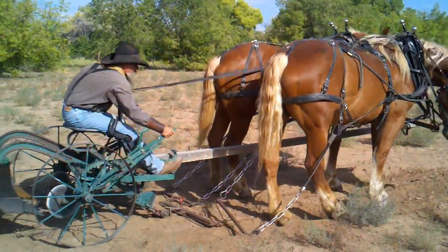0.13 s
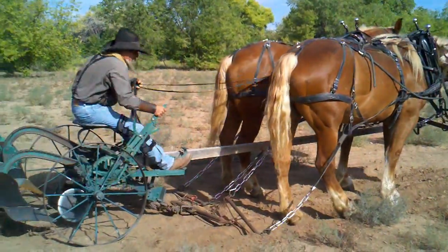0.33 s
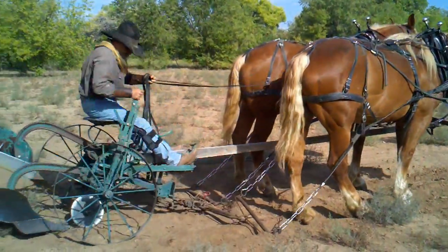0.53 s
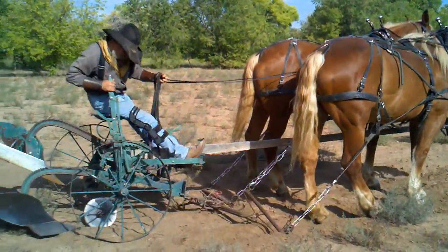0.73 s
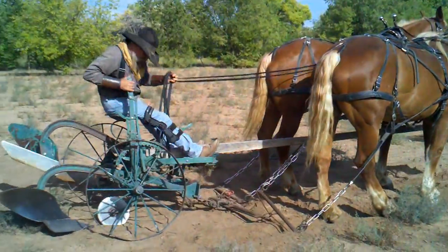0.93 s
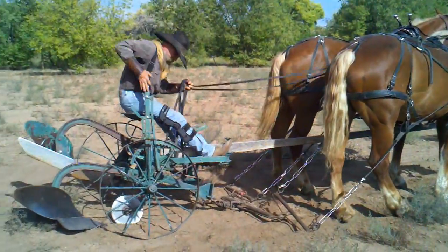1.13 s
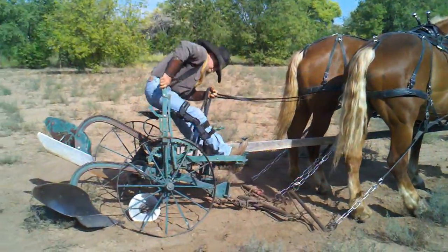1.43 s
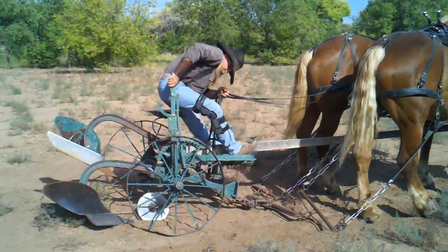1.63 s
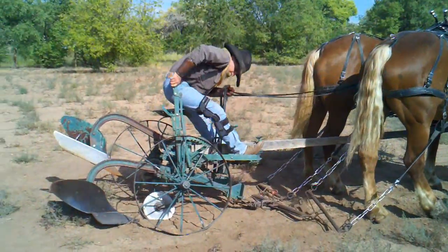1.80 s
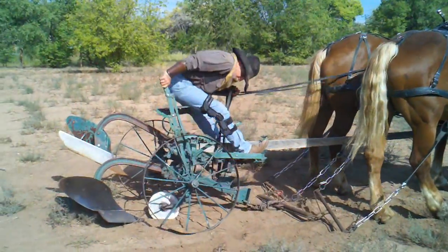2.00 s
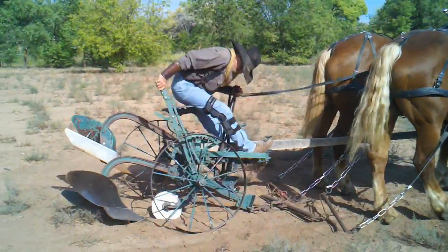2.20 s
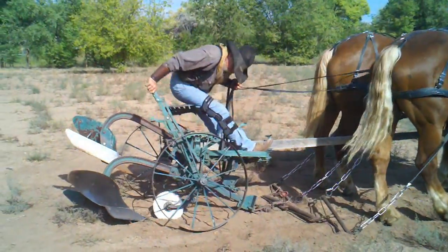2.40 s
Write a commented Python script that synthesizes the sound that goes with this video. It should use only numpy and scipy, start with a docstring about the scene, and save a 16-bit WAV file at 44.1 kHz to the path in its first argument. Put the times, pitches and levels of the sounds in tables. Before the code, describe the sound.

A steel plow clatters as it rolls over open ground, with hollow knocks and small clinks. It quiets briefly, then a lever clacks sharply and settles. Faint wind and crunching soil lie beneath, all heard close in wide stereo.

```python
"""On dry open ground, a horse-drawn steel plow rolls along while its lift lever is hauled back.
Loose links and rods clatter and scrape on the frame; after a lull the lever gives a short falling
groan, clacks home, and the linkage settles. Pins jingle, a chain link clinks, and plow and lever
knock hollowly. Wheels crunching soil and a faint wind make the bed. A camera's two close
microphones hear it all through a stereo widener."""
import sys
import numpy as np
from scipy import signal
from scipy.fft import rfft, irfft, next_fast_len
from scipy.io import wavfile
from scipy.ndimage import uniform_filter1d

SR = 44100
rng = np.random.default_rng(int(sys.argv[2]) if len(sys.argv) > 2 else 0)


def pcm_store(signal):
    """Save signal as 16-bit PCM."""
    levels = np.round(np.clip(np.atleast_2d(signal), -1, 1) * 32767)
    wavfile.write(sys.argv[1], SR, levels.astype(np.int16).T)


N = 112454

# metal hits: t/s, bass level/dB, middle level/dB, treble level/dB, rattle against the crack/dB
HITS = [(0.01, -43.5, -39.5, -36.5, -11.5), (0.04, -44, -35.5, -39.5, -18.5), (0.06, -42, -37, -69, -14),
        (0.113, -38.5, -37.5, -42, -22), (0.194, -39, -35, -42, -5.5), (0.211, -71, -37.5, -41, 2.5),
        (0.236, -48, -22.5, -26.5, -15), (0.245, -34, -27.5, -25.5, -12.5), (0.312, -46.5, -32.5, -36, 1.5),
        (0.334, -49, -31, -25, -11.5), (0.348, -26.5, -25.5, -32.5, -16.5), (0.402, -44.5, -27, -32, 0),
        (0.423, -38.5, -61, -30, -4.5), (0.429, -37, -24, -20, -14.5), (0.467, -37, -25.5, -49, -8),
        (0.492, -50, -41.5, -44.5, 3.5), (0.517, -73, -27, -28, -26), (0.559, -53, -19, -13, -21),
        (0.568, -30, -26.5, -23.5, -5.5), (0.588, -28, -22, -26, -10.5), (0.596, -32, -21, -17, -32),
        (0.639, -33, -26.5, -24, -6.5), (0.65, -29.5, -20, -20.5, -9.5), (0.663, -36, -21, -13, -22.5),
        (0.689, -21, -20.5, -32, -6), (0.715, -31, -16.5, -15.5, -12.5), (0.725, -54, -21, -14.5, -13.5),
        (0.729, -38, -18, -13, -16), (0.738, -41, -30, -15, -25), (0.769, -39, -30, -55, -4),
        (0.795, -27.5, -27, -32, -11), (0.832, -38, -33, -34.5, -4), (0.851, -37, -34.5, -28, -10.5),
        (0.912, -32, -34, -61, -8.5), (0.93, -68, -47.0, -42, -5.5), (0.957, -38.5, -39, -39, -4),
        (1.013, -32.5, -28.5, -67, -19), (1.027, -32, -29, -45, -22.5), (1.139, -46, -41.5, -54, -7.5),
        (1.152, -52, -46.5, -49.5, -1), (1.168, -53, -43.5, -56, -11), (1.193, -49, -43.5, -49, -3.5),
        (1.256, -71.5, -40.5, -41, -11.5), (1.29, -52, -51, -68, -16), (1.453, -67, -42, -52, -14),
        (1.765, -53, -45, -60, -48), (1.799, -58, -46, -54, -6), (1.831, -43, -57, -82, -2.5),
        (1.855, -42, -37.0, -31.5, -22), (1.88, -43, -57, -72, 4.5), (1.916, -34, -34.5, -30, -8),
        (1.933, -32.5, -31, -62, -9.5), (1.963, -46, -19.5, -21, -13), (1.966, -47, -17, -13.5, -24.5),
        (1.9692, -36, -14.5, -10, -30), (1.98, -27.5, -28, -38, -5.5), (1.992, -41.0, -38, -36, 1),
        (2.034, -76, -37, -29.5, -7.5), (2.067, -47, -39.5, -37.0, -4), (2.098, -27.5, -24, -21, -8),
        (2.116, -36, -41, -25, -16), (2.142, -55, -31, -31, -10), (2.189, -36.5, -24.5, -34, -12.5),
        (2.219, -35, -48, -32, -10), (2.238, -63, -43, -41, -8), (2.287, -37, -27.5, -24, -7),
        (2.296, -36, -35, -33.5, -6), (2.32, -59, -36.5, -51, -3.5), (2.358, -52, -34, -40, -8),
        (2.485, -62, -50, -54, -3)]
# bass, middle and treble of a hit: low f/Hz, high f/Hz
HIT_BANDS = [(150, 550), (550, 2600), (2600, 14500)]
# resonances of the frame and of the lever linkage: f/Hz, level over the broad tone/dB, t60/s
FRAME_MODES = [(225.6, -3, 0.59), (312, -9, 0.047), (565, 6, 0.085), (768, 3.5, 0.025), (844, -10, 0.19),
               (1174, 6.5, 0.14), (1257, 12, 0.021), (1473, 4, 0.092), (1553, -6.5, 0.16),
               (2010, 3.5, 0.028), (5475, 10, 0.02), (6130, 3, 0.074), (7910, 6, 0.025),
               (10080, 13.5, 0.027), (11230, -4, .06), (12800, -8, 0.038)]
LINKAGE_MODES = [(693, 0, 0.051), (1136, -3, 0.1), (1562, 0, 0.055), (1900, -3, 0.022), (3600, 4.5, 0.03),
                 (3940, -1, 0.031), (4550, 5, 0.026), (5450, 8.5, 0.044), (6000, -8, .03), (7890, 9, .04),
                 (8850, -23, 0.066), (9600, -9, 0.057)]
# broad tone of all the steelwork, and the lever's own tone on top: f/Hz, level/dB
STEEL_EQ = [(100, 0), (200, -6), (310, 3), (430, -14.5), (650, -3.5), (1250, -13.5), (2000, -8.5),
            (3000, -4), (4000, -3), (5800, 0.5), (7300, -7), (8700, -3), (9800, -8), (11500, -11.5),
            (14000, -5)]
LEVER_EQ = [(200, -1), (700, -1), (1200, 2.5), (1800, 3), (3600, 0.5), (6500, -3), (9800, 7), (11200, 1.5),
            (12400, -3.5), (14000, -2.5)]
# steel dragging on steel: t/s, level/dB
SCRAPE_FADER = [(0, -68), (.17, -64), (.24, -33), (.29, -54), (.35, -41), (.385, -60), (.43, -38),
                (.545, -55), (.59, -49), (.625, -44), (0.659, -30), (.75, -37), (.87, -50), (1.099, -65)]
# its tone: f/Hz, level/dB
SCRAPE_EQ = [(100, -35), (400, -9), (1200, -9), (2500, -2.5), (5000, -3), (9000, -2), (14000, -4)]
# hollow knocks and clanks of the plow and its lever, with the lever's short falling groan:
# t/s, f/Hz, level/dB, t60/s
HOLLOW_KNOCKS = [(.111, 1038, -39.5, 0.031), (.47, 536, -39.5, 0.13), (.565, 710, -38.5, 0.067),
                 (.582, 1280, -28.5, 0.049), (.639, 1174, -32.5, 0.049), (.648, 1470, -49, 0.051),
                 (.687, 715, -24.5, 0.056), (.729, 1254, -32, 0.059), (.922, 309, -37, 0.11),
                 (1.139, 390, -42, 0.025), (1.193, 493, -49, 0.11), (1.193, 648, -42, 0.037),
                 (1.193, 1276, -39, 0.016), (1.29, 755, -50, 0.058), (1.725, 462, -44.5, 0.018),
                 (1.85, 561, -45, 0.11), (1.885, 474, -48.5, 0.18), (1.975, 727, -34, .05),
                 (2.1, 761, -40.5, 0.068), (2.192, 692, -42.5, 0.12), (2.29, 696, -43.5, 0.052)]
# small parts ringing on: t/s, f/Hz, level/dB, t60/s
SMALL_PINGS = [(.665, 6450, -42, 0.12), (0.731, 5640, -39, 0.049), (.729, 10400, -32, 0.089),
               (.729, 11260, -36, 0.057), (.735, 10070, -45, 0.19), (.729, 10885, -39, .43),
               (.74, 10939, -46, .5), (.74, 10835, -44, .32), (.768, 3860, -41, 0.14),
               (.74, 12600, -47, 0.25), (2.012, 4030, -51, 0.036), (2.033, 3094, -34.5, 0.055),
               (2.033, 4430, -51, 0.045), (2.034, 12000, -30, 0.079), (2.066, 6300, -44, .05),
               (2.1, 3935, -46, 0.12), (2.1, 1610, -45, 0.071), (2.1, 6120, -43, 0.086),
               (2.1, 8430, -40, 0.15), (2.135, 3660, -52.5, 0.079), (2.215, 12200, -46, 0.083),
               (2.215, 9150, -34, 0.053), (2.29, 3630, -51, 0.36), (2.29, 4560, -53, 0.077),
               (2.29, 9200, -47, 0.069), (2.3, 2062, -42, 0.08)]
# modes of a chain link: f/Hz, level/dB, t60/s
LINK_MODES = [(9170, 4, 0.084), (9340, -2.5, 0.1), (9800, -25, 0.098), (10000, -24, 0.15),
              (12440, -18, 0.12)]
# its clinks: t/s, level/dB
LINK_CLINKS = [(.83, -45.5), (1.06, -66.5), (1.205, -45.5), (1.222, -39)]
# wheels grinding on soil: t/s, level/dB
WHEEL_FADER = [(0, -54), (.2, -53), (.7, -49), (1.001, -51), (1.15, -62.5), (1.352, -65.5), (1.75, -71),
               (1.87, -53.5), (2.2, -50.5), (2.55, -66)]
# tone of the crushed soil, and of the wind and distance: f/Hz, level/dB
SOIL_EQ = [(60, -2.5), (150, -2), (350, -3.5), (700, 4), (1400, -2.5), (2200, -5.5), (4000, -23.5),
           (14000, -20.5)]
WIND_EQ = [(25, -81), (50, -11.5), (100, 10.5), (170, 6.5), (300, 1), (600, -9), (1200, -25.5), (2200, -28),
           (4000, -20.5), (8000, -29), (14000, -23.5)]
# head start of the left microphone as the camera pans: t/s, lead/ms
LEFT_LEAD = [(.5, 0.093), (2.0, 0.043)]
# tone of the right channel against the left: f/Hz, level/dB
RIGHT_EQ = [(60, 0), (300, -2), (600, -1.3), (1200, 1.7), (2200, 2.6), (4000, .6), (8000, .9), (13000, -.7)]

LEVER_FROM_S, LEVER_RIGHT_DB = 1.83, 1.2  # later hits land on the lever, which sits a little right
# each pair: hitch end, lever end
CRACK_T60_S, ATTACK_S, CONTACTS_PER_S = (0.038, 0.028), (0.0017, 0.0011), (4000, 1200)
PART_T60_S, PART_DB = (0.041, 0.026), (-5, -2)
RATTLE_T60_S = (0.49, 0.24, 0.21)  # bass, middle, treble


def plow():
    """Hits and scraping ring the frame; the later hits ring the lever and its linkage."""
    hitch, lever = np.zeros((2, 2, N))
    for s, *band_db, rattle_db in HITS:
        on_lever = s > LEVER_FROM_S
        add(lever if on_lever else hitch, s, hit(s, band_db, rattle_db, end=int(on_lever)))
    pan = amp([[-LEVER_RIGHT_DB / 2], [LEVER_RIGHT_DB / 2]])
    linkage = eq(steel_body(lever, LINKAGE_MODES), LEVER_EQ) * pan
    frame = steel_body(hitch + scrape(), FRAME_MODES)
    return eq(frame + linkage, STEEL_EQ)


def hit(s, band_db, rattle_db, end):
    """A hard crack rings a loose part; the rattle tail dies away, treble first."""
    t = np.arange(SR // 2) / SR
    crack = mic_pair(chatter(len(t), CONTACTS_PER_S[end]), lead_at(s), diffuse=0.87)
    crack *= amp(-60 * t / CRACK_T60_S[end])
    rattle = mic_pair(chatter(len(t), CONTACTS_PER_S[end]), lead_at(s), diffuse=0.87) * amp(rattle_db)
    attack = 1 - np.exp(-t / ATTACK_S[end])
    impact = 0
    for (lo, hi), db, t60 in zip(HIT_BANDS, band_db, RATTLE_T60_S):
        force = (crack + rattle * amp(-60 * t / t60)) * attack
        makeup = np.sqrt(SR / 2 / (hi - lo))
        impact += amp(db) * makeup * butter(force, 3, (lo, hi), "bandpass")
    ring = signal.fftconvolve(impact, loose_part(PART_T60_S[end])[None], axes=1)[:, :len(t)]
    send = amp(PART_DB[end])
    return (impact + send * ring) / np.hypot(1, send)


def chatter(size, per_s, grain_share=0.71):
    """Rapid metal contacts over the dense wash of ringing they leave."""
    contacts = grains(size, per_s, spread_db=4.5)
    wash = rng.standard_normal((3, size))
    return np.sqrt(grain_share) * contacts + np.sqrt(1 - grain_share) * wash


def loose_part(t60, size=5000, count=22, low_hz=904, high_hz=12098):
    """The ring of one small steel part: unevenly spaced dying modes, at unit energy."""
    t = np.arange(size) / SR
    place = (np.arange(count)[:, None] + rng.random((count, 1))) / count
    hz = (np.sqrt(low_hz) * (1 - place) + np.sqrt(high_hz) * place) ** 2
    modes = np.sin(2 * np.pi * (hz * t + rng.random((count, 1))))
    return unit(modes.sum(0) * amp(-60 * t / t60)) / np.sqrt(size)


def steel_body(force, modes):
    """A steel body passes the force on and adds its own resonances."""
    out = force.copy()
    for hz, db, t60 in modes:
        radius = np.exp(-np.log(1000) / (t60 * SR))
        pole = radius * np.exp(2j * np.pi * hz / SR)
        out += amp(db) * 2 * signal.lfilter([1 - radius], [1, -pole], force).real
    return out


def scrape():
    """Chains and rods drag over the frame between hits: a dense crunch of tiny slips."""
    slips = mic_pair(grains(N, per_s=3800, spread_db=1.5), lead_ms=0.11, diffuse=0.67)
    return unit(eq(slips, SCRAPE_EQ)) * fader(SCRAPE_FADER)


def jingle(steel, threshold_db=-52, cap_db=-37, low_hz=3004, high_hz=13650, t60=0.05):
    """Pins and washers clink at random on three modes each, as loud as the steel shakes them."""
    treble = butter(steel[0], 2, 3000, "highpass")
    envelope = np.sqrt(signal.lfilter(np.ones(600), 600, treble ** 2))
    shake = np.clip(envelope - amp(threshold_db), 0, amp(cap_db))
    out, t = np.zeros((2, N)), np.arange(SR // 10) / SR
    for when, softness, side, *pitches in rng.random((240, 6)):
        hz = low_hz * (high_hz / low_hz) ** np.array(pitches)[:, None]
        clink = np.sin(2 * np.pi * hz * t).sum(0) * amp(2 - 12 * softness - 60 * t / t60)
        pan = np.sqrt([[side], [1 - side]])
        add(out, when * N / SR, shake[int(when * N)] * pan * clink)
    return out


def struck_parts(strikes, attack_s, flutter_db=3, bounce_s=0.012, bounce_gain=0.37):
    """Each strike rings one mode, fluttering as the part shakes, with three quick bounces."""
    out, t = np.zeros((2, N)), np.arange(SR // 2) / SR
    for s, hz, db, t60 in strikes:
        envelope = amp(db - 60 * t / t60) * (1 - np.exp(-t / attack_s))
        flutter = amp(flutter_db * unit(uniform_filter1d(rng.standard_normal(len(t)), size=250)))
        ring = np.sqrt(2) * np.sin(2 * np.pi * hz * t) * envelope * flutter
        pair = np.array([ring, delay(ring, lead_at(s))])
        gaps = bounce_s * (0.5 + rng.random(3))
        for bounce, late in enumerate(np.r_[0, np.cumsum(gaps)]):
            add(out, s + late, pair * bounce_gain ** bounce)
    return out


def chain_link():
    """One chain link clinks a few times, always on the same modes."""
    strikes = [(s, hz, level + db, t60) for s, level in LINK_CLINKS for hz, db, t60 in LINK_MODES]
    return struck_parts(strikes, attack_s=0.002)


def wheels():
    """Steel rims crush dry crumbs of soil."""
    crunch = mic_pair(grains(N, per_s=1200, spread_db=0.5), lead_ms=0.19, diffuse=0.8)
    return unit(eq(crunch, SOIL_EQ)) * fader(WHEEL_FADER)


def wind(level_db=-56, gust_db=-0.5):
    """A faint bed of air, its low end swelling unevenly."""
    noise = mic_pair(rng.standard_normal((3, N)), lead_ms=0.02, diffuse=1.0, apart_hz=138)
    air = unit(eq(noise, WIND_EQ))
    lows = butter(air, 1, 500, "lowpass")
    gust = unit(uniform_filter1d(uniform_filter1d(rng.standard_normal(N), size=1300), size=900))
    return amp(level_db) * (air + lows * (amp(gust_db * gust) - 1))


def grains(size, per_s, spread_db):
    """Three independent trains of tiny contacts, uneven in strength."""
    shape = (3, size)
    strength = amp(spread_db * np.minimum(rng.exponential(1, shape), 3))
    polarity = np.sign(rng.standard_normal(shape))
    return unit(strength * polarity * (rng.random(shape) < per_s / SR))


def mic_pair(layers, lead_ms, diffuse, apart_hz=1500):
    """Direct sound reaches the left microphone first; scattered sound spreads wide above apart_hz."""
    direct, mid, side = layers
    side = butter(side, 1, apart_hz, "highpass")
    scattered = np.array([mid + side, mid - side]) / np.sqrt(2)
    return np.sqrt(1 - diffuse ** 2) * np.array([direct, delay(direct, lead_ms)]) + diffuse * scattered


def lead_at(s):
    """The left microphone's head start in ms at time s."""
    return np.interp(s, *np.transpose(LEFT_LEAD))


def fader(points):
    """A gain ride through points of t/s, level/dB."""
    return amp(np.interp(np.arange(N) / SR, *np.transpose(points)))


def eq(x, points):
    """Minimum-phase EQ through points of f/Hz, level/dB."""
    hz, db = np.transpose(points)
    bin_hz = abs(np.fft.fftfreq(4096, 1 / SR))
    log_gain = np.log(amp(np.interp(np.log(bin_hz + 1), np.log(hz), db)))
    response = np.exp(np.conj(signal.hilbert(log_gain)))
    taps = np.fft.ifft(response).real[:2048]
    return signal.oaconvolve(x, taps[None], axes=1)[:, :N]


def butter(x, order, hz, kind):
    """Filters with a flat passband."""
    return signal.sosfilt(signal.butter(order, hz, kind, fs=SR, output="sos"), x)


def delay(x, ms):
    """Delays by a fraction of a millisecond."""
    size = next_fast_len(x.shape[-1] + 256)
    shift = np.exp(-2j * np.pi * np.fft.rfftfreq(size, 1 / SR) * ms / 1000)
    return irfft(rfft(x, size) * shift, size)[..., :x.shape[-1]]


def add(mix, s, sound):
    """Mixes a sound in at time s."""
    part = mix[:, max(round(s * SR), 0):][:, :sound.shape[-1]]
    part += sound[..., :part.shape[1]]


def amp(db):
    """Decibels to gain."""
    return 10 ** (np.asarray(db) / 20)


def unit(x):
    """Scales to rms 1."""
    return x / np.sqrt(np.mean(x ** 2) + 1e-20)


def scene():
    """The mix at the microphones: plow up front, its loose parts on top, wheels and wind beneath."""
    steel = plow()
    sparkle = jingle(steel) + struck_parts(SMALL_PINGS, attack_s=0.00035) + chain_link()
    knocks = struck_parts(HOLLOW_KNOCKS, attack_s=0.00095)
    return steel + sparkle + knocks + wheels() + wind()


def record(dry):
    """The widener subtracts a delayed copy of the opposite side; then right-channel EQ and a high cut."""
    cross_gain, cross_ms, side_db, cut_hz = 0.84, 0.38, -0.5, 14100
    wide = (dry - cross_gain * delay(dry[::-1], cross_ms)) / np.hypot(1, cross_gain)
    mid = wide.mean(0)
    wide = mid + amp(side_db) * (wide - mid)
    toned = np.array([wide[0], eq(wide[1:], RIGHT_EQ)[0]])
    high_cut = signal.firwin(401, cut_hz, window=("kaiser", 8), fs=SR)
    return signal.oaconvolve(toned, high_cut[None], "same")


dry = scene()
out = record(dry)
pcm_store(out)
```